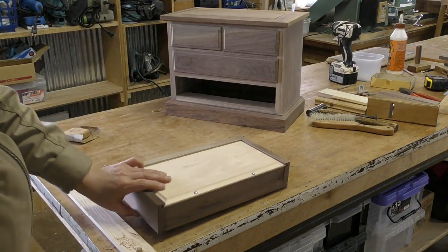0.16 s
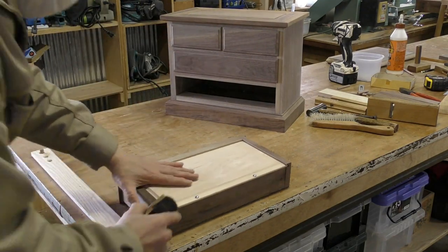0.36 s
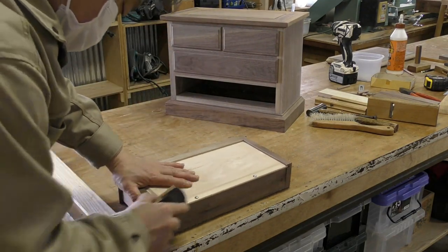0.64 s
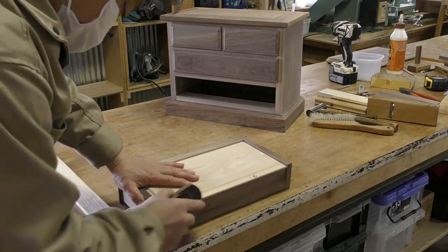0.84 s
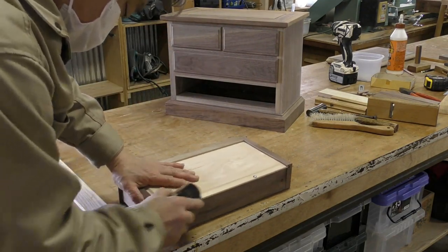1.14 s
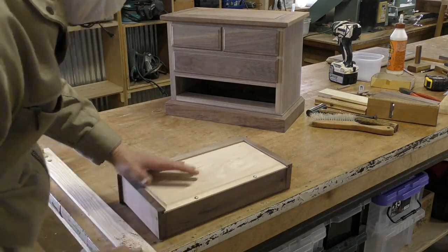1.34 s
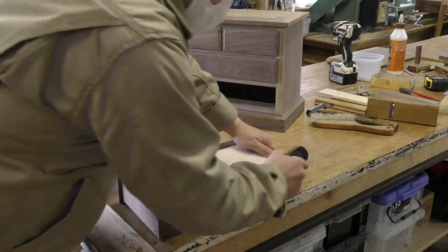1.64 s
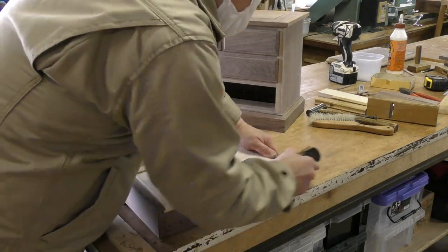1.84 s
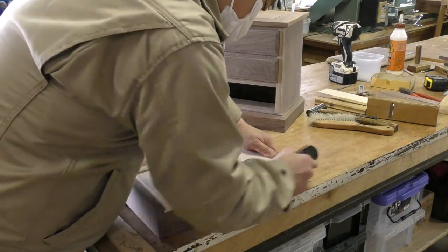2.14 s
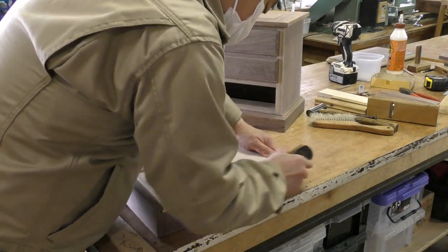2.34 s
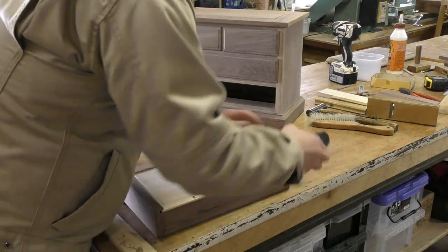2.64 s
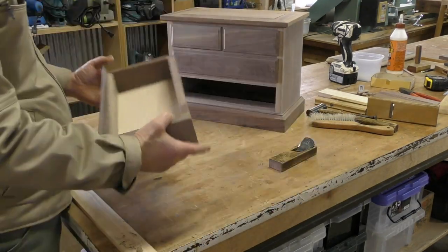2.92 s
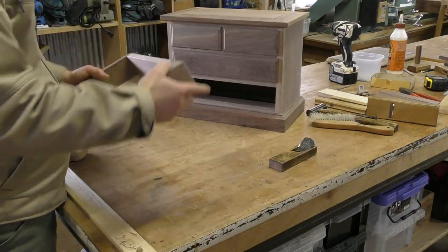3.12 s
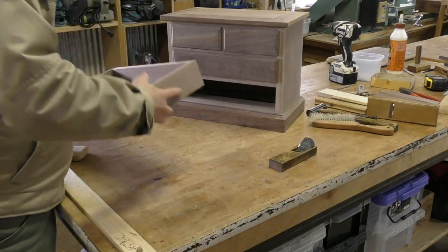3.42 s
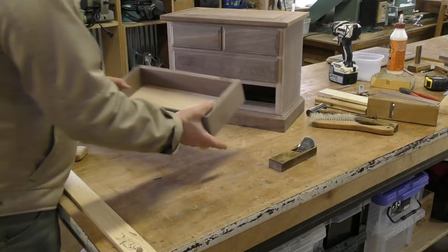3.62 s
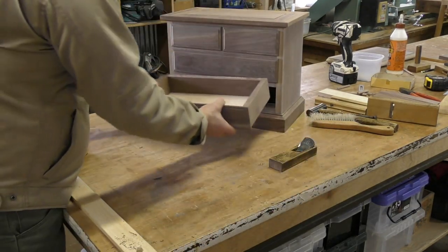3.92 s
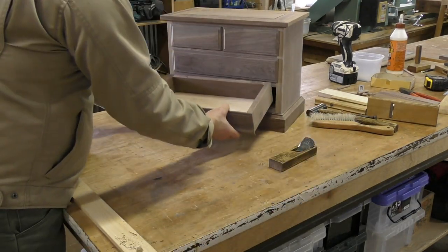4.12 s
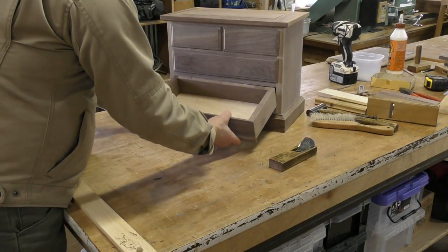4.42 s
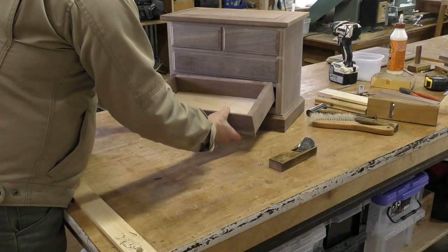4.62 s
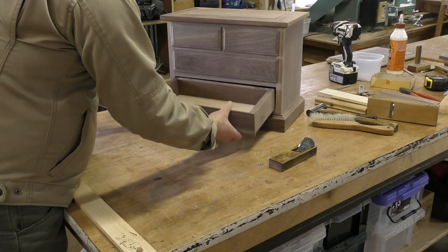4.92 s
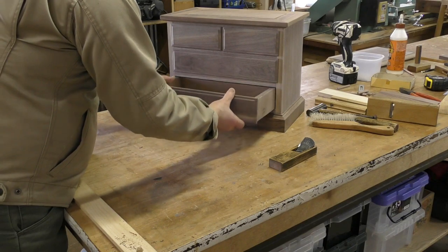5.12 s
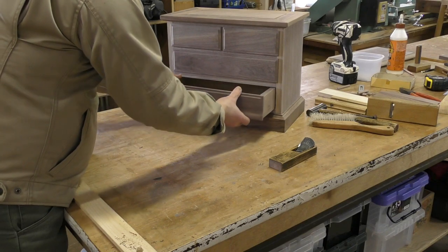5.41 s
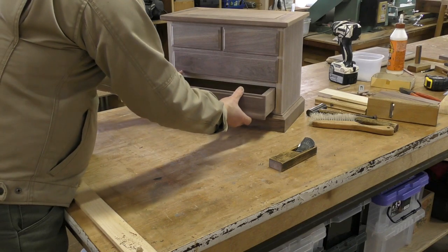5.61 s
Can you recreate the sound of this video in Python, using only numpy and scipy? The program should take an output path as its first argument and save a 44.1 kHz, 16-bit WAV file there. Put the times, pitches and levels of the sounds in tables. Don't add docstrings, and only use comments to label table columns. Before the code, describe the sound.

Workshop bench, close stereo microphone, with electrical lamp buzz over a low room hum. A hollow wooden drawer drags and knocks down, then sped-up hand plane strokes hiss, rap and thump it in hurried bursts. An abrupt cut brings rustling sleeves, light wooden knocks against a cabinet, a sharper clack, and a short groaning slide on wooden runners with a faint squeak.

```python
import sys
import numpy as np
from scipy import signal
from scipy.fft import rfft, irfft, next_fast_len
from scipy.io import wavfile
from scipy.ndimage import uniform_filter1d

SR = 44100
rng = np.random.default_rng(int(sys.argv[2]) if len(sys.argv) > 2 else 0)


def undo_db(level):
    steps = np.asarray(level, float) / 20
    return 10 ** steps


def unload_audio(sound):
    columns = np.transpose(np.atleast_2d(sound))
    steps = np.round(np.clip(columns, -1, 1) * 32767)
    wavfile.write(sys.argv[1], SR, steps.astype(np.int16))


N = 254010
TIME = np.arange(N) / SR
CUT_S = 2.962


def unit(x):
    return x / np.sqrt(np.mean(x ** 2) + 1e-20)


def along(points, hz):
    f, v = np.transpose(points)
    return np.interp(np.log(hz + 1), np.log(f + 1), v)


def filtered(x, response):
    m = next_fast_len(N + SR // 2)
    return irfft(rfft(x, m) * response(np.fft.rfftfreq(m, 1 / SR)), m)[..., :N]


def shaped(spectrum):
    return lambda hz: undo_db(along(spectrum, hz))


def resonant(peaks):
    return lambda f: sum(undo_db(db) * (1j * f * w / (c * c - f * f + 1j * f * w)) ** 2 for c, w, db in peaks)


def tone(hz, t):
    return np.sin(2 * np.pi * (hz * t + rng.random()))


def field(shape, across, over):
    return unit(uniform_filter1d(uniform_filter1d(rng.standard_normal(shape), across, -2), over, -1))


def rush(response, patchy_db, alike):
    z = signal.stft(rng.standard_normal((2, N)), nperseg=512)[2]
    patches = undo_db(patchy_db * field(z.shape[1:], across=5, over=6))
    pair = signal.istft(z * patches, nperseg=512)[1][:, :N]

    def mid_side(hz):
        turn = np.arccos(np.clip(along(alike, hz), -1, 1)) / 2
        return response(hz) * [np.cos(turn), np.sin(turn)]

    mid, side = filtered(pair, mid_side)
    return unit(np.array([mid + side, mid - side]))


def dying(t60, length, size=256):
    hz, t, z = signal.stft(rng.standard_normal((2, length)), SR, nperseg=size)
    return signal.istft(z * undo_db(-60 * t / t60(hz)[:, None]), SR, nperseg=size)[1][:, :length]


def swells(rows):
    t = TIME[::32]
    total = 0
    for s, db, rise, fall in rows:
        lengths = np.where(t < s, (s - t) / rise, (t - s) / fall)
        total = total + undo_db(db - 9 * np.clip(lengths, 0, 12))
    return np.interp(TIME, t, total)


def bursts(rows, voice, swell, fade):
    out = np.zeros(N)
    for s, db, rise, fall, *pitch in rows:
        span = slice(max(round((s - .06) * SR), 0), round((s + .2) * SR))
        t = TIME[span] - s
        shape = undo_db(-9 * np.where(t < 0, np.abs(t / rise) ** swell, np.abs(t / fall) ** fade))
        sound = voice(t, span, *pitch)
        level = np.sqrt(np.sum(shape ** 2) / np.sum((shape * sound) ** 2))
        out[span] += undo_db(db) * shape * sound * level
    return out


def timed(s, db, shape, *voice, slower_db=0):
    return (s, db, shape[0] * undo_db(slower_db), shape[1], *voice)


# freq_hz, level_db
LAMP_LINES = [(2008, -82), (2826, -79), (3908, -86), (4269, -89), (4387, -87), (4748, -86), (4990, -85),
              (5227, -87), (5469, -87), (5771, -87), (5889, -86), (6191, -87), (6250, -82), (6368, -86),
              (6492, -82), (6551, -81), (6611, -83), (6729, -79), (6971, -88), (7090, -74), (7332, -82),
              (7450, -83), (7574, -81), (7693, -84), (7811, -86), (7935, -90), (8533, -87), (8656, -83),
              (10880, -89), (12080, -90)]
# freq_hz, level_db
LAMP_COMB = [(900, -104), (2000, -97), (4000, -96), (7000, -93), (9000, -98), (13000, -100)]
MAINS_HZ, STEADY_HZ = 60.09, 7090
SLIP_S, SLIP_RAD = .6, 1.75


def lamps():
    bin_of = lambda hz: np.round(hz * N / SR)
    comb = MAINS_HZ * np.arange(15, 220)
    comb_db = along(LAMP_COMB, comb) + 6.1 * np.clip(rng.standard_normal(len(comb)), -3, 1)
    levels = dict(zip(bin_of(comb), comb_db))
    levels.update({bin_of(round(hz / MAINS_HZ) * MAINS_HZ): db for hz, db in LAMP_LINES})
    grid = np.zeros(N // 2 + 1, complex)
    for k, db in levels.items():
        grid[int(k)] = undo_db(db) * N / np.sqrt(2) * np.exp(2j * np.pi * rng.random())
    slip = np.exp(.5j * SLIP_RAD * np.array([[1], [-1]]))
    apart = irfft(grid * slip, N)
    near = np.abs(np.fft.rfftfreq(N, 1 / SR) - STEADY_HZ) < MAINS_HZ / 2
    early = apart + irfft(grid * near * (1 - slip), N)
    return np.where(TIME < SLIP_S, early, np.where(TIME < CUT_S, apart, irfft(grid, N)))


# freq_hz, level_db_per_hz
HUM = [(15, -51), (25, -24.5), (152, -6.5), (340, -5), (568, -21.5), (805, -23), (1080, -20), (2010, -18),
       (2240, -23), (2850, -20.5), (3180, -27.5), (4160, -29), (7320, -32.5), (8160, -31.5), (15600, -33.5)]
# freq_hz, likeness
HUM_ALIKE = [(60, 0.73), (300, 0.88), (1400, 0.81), (3500, 0.21), (7000, 0.067), (15000, 0.44)]


def background():
    return undo_db(-59.0) * rush(shaped(HUM), patchy_db=1.5, alike=HUM_ALIKE)


# peak_s, rustle_db, rise_s, fall_s, brush_over_rustle_db
MOVES = [(.058, -67, 0.021, 0.086, 2.5), (0.252, -79, 0.0037, 0.05, 13), (1.6, -73, 0.071, 0.19, -0.5),
         (2.972, -64, 0.011, 0.18, 3), (3.138, -59, 0.02, 0.032, -2.5), (3.309, -55, 0.049, 0.017, -6),
         (3.371, -51.5, 0.043, 0.053, -13.5), (3.49, -65, 0.01, 0.17, -16), (3.65, -69.5, 0.27, 0.45, 4.5),
         (3.748, -59.5, 0.04, 0.031, -38), (3.868, -63, 0.021, 0.02, -29), (3.948, -57, 0.0018, 0.025, 7.5),
         (5.37, -62.5, 0.14, 0.11, -6), (5.488, -68, 0.056, 0.13, -25)]
# freq_hz, level_db_per_hz
RUSTLE = [(1470, -63), (2500, 7), (2910, 4.5), (4170, 7), (4900, 4.5), (7820, 3), (8900, 5), (10200, 4),
          (15600, -3.5)]
# freq_hz, level_db_per_hz
BRUSH = [(350, -19), (600, -4), (871, -4.5), (1120, 4.5), (1680, 4.5), (1840, 8), (4000, -18), (5200, -22),
         (8800, -120)]


def sleeves():
    rustle = swells([row[:4] for row in MOVES])
    brush = swells([(s, db + more_db, rise, fall) for s, db, rise, fall, more_db in MOVES])
    cloth = rush(np.ones_like, patchy_db=1.9, alike=[(1000, .75), (4000, .8), (7000, .92), (15000, .84)])
    return rustle * unit(filtered(cloth, shaped(RUSTLE))) + brush * unit(filtered(cloth, shaped(BRUSH)))


def rubbing():
    return rush(np.ones_like, patchy_db=1, alike=[(100, .93), (5000, .85)])


# peak_s, level_db, rise_s, fall_s, body_hz
DRAGGING = [
    (.062, -49.5, 0.015, 0.027, 300),
    (.07, -65, .015, 0.024, 516),
    (.13, -56.5, .04, 0.047, 198),
]
DRAG_WIDTH_HZ = 98


def dragging():
    rub = rubbing()
    return sum(swells([row]) * unit(filtered(rub, resonant([(hz, DRAG_WIDTH_HZ, 0)])))
               for *row, hz in DRAGGING)


# start_s, crack_peak_db, hollow_over_crack_db,
# hardness_db_per_octave, carcass_over_hollow_db
KNOCKS = [(0.28, -33.5, -10.5, 2.5, -24), (0.297, -45, -4.5, 1.5, -28), (0.308, -38.5, -25, -1, -12),
          (2.914, -38.5, -17, -1.5, -43), (2.917, -33.5, -23, -4, -27), (2.9256, -42.5, -20, -2, -27),
          (2.949, -42, -16, 1, -27), (3.944, -37.5, -28, 0.5, -22), (4.216, -34.5, 2.5, -4.5, -2),
          (4.222, -54.5, 16.5, -5, -15), (4.737, -29.5, -7, -3.5, -10.5), (4.745, -49.5, 16, -8, -8.5),
          (4.856, -20, -17.5, 1, -13), (4.86, -27.5, -10, -1, -15), (4.8668, -25, -12, 1, -19),
          (5.45, -34, -11.5, -10.5, 13)]
# freq_hz, level_db_per_hz
CRACK = [(260, -7.5), (450, -7), (756, -18), (1090, -7.5), (2700, -13.5), (4670, -21), (5100, -26),
         (6010, -29), (8450, -33), (11900, -37.5), (15500, -70)]
# freq_hz, t60_s
WOOD = [(500, 0.2), (1000, 0.12), (1500, 0.087), (3000, 0.11), (6000, 0.11), (12000, 0.086)]
# freq_hz, level_db, t60_s
HOLLOW = [(196, -2, 0.2), (258, 9, 0.15), (319, 9.5, 0.085), (385, -9, 0.085)]
# freq_hz, level_db, t60_s
SIDES = [(361, -7, 0.3), (501, 0, 0.32), (1010, -4, 0.16), (1270, 10, 0.045), (1730, -13, 0.18),
         (2000, -13, 0.2), (2350, -14, 0.22), (2720, -15, 0.2), (2990, -8, 0.04), (3990, -20, 0.15),
         (4580, -20, 0.1)]
# freq_hz, level_db, t60_s
CARCASS = [(152, 6, 0.37)]
BENCH_RING, CABINET_RING = 1.3, 0.69
RING_PER_HOLLOW_DB, BENCH_DAMP_DB = 0.43, -12


def ring(modes, t, length):
    return sum(undo_db(db + rng.normal(0, 1.0) - 60 * t / (t60 * length)) * tone(hz, t) for hz, db, t60 in modes)


def knocks():
    out, t = np.zeros(N + SR), np.arange(SR // 4) / SR
    hz = np.fft.rfftfreq(len(t), 1 / SR)
    octaves = np.log2(np.clip(hz, 500, None) / 1000)
    closing = np.sqrt(np.clip(5 * (1 - t / t[-1]), 0, 1)) ** 4
    for s, db, hollow_db, hardness_db, carcass_db in KNOCKS:
        on_bench = s < CUT_S
        length = (BENCH_RING if on_bench else CABINET_RING) * undo_db(RING_PER_HOLLOW_DB * min(hollow_db, 0))
        colour = undo_db(along(CRACK, hz) + hardness_db * octaves)
        noise = dying(lambda f: length * along(WOOD, f), len(t), size=128)[0]
        dense = irfft(rfft(noise) * colour, len(t))
        sides_db = -11.5 + 2 * hardness_db + BENCH_DAMP_DB * on_bench
        crack = dense / np.abs(dense).max() + undo_db(sides_db) * ring(SIDES, t, length)
        hollow = ring(HOLLOW, t, length) + undo_db(carcass_db) * ring(CARCASS, t, length)
        sound = crack * (1 - np.exp(-t / .001)) + undo_db(hollow_db - 3) * hollow * (1 - np.exp(-t / .004))
        out[round(s * SR):][:len(t)] += undo_db(db) * sound * closing
    return out[:N]


# freq_hz, level_db
BOX = [(255, -22), (325, -10), (372, -9.5), (410, -24), (500, -23)]


def thump(t, span, hz, second_hz, second_db):
    rest = sum(undo_db(db + rng.normal(0, 2.6)) * tone(c * rng.normal(1, 0.054), t) for c, db in BOX)
    return tone(hz, t) + undo_db(second_db) * tone(second_hz, t) + rest


# freq_hz, level_db
PLATES = [(650, -8.5), (745, -13), (985, -13), (1190, -14.5), (1370, -8.5), (1530, -7), (1760, -8),
          (1960, -9.5), (2150, -10.5), (2800, -14)]
NOTE_DB, NOTE_DAMP_DB_PER_S = 1, 330


def rap(t, panel, hz, bottom_hz, bottom_db):
    plates = sum(undo_db(db + rng.normal(0, 2.5)) * tone(c * rng.normal(1, .01), t) for c, db in PLATES)
    notes = tone(hz, t) + undo_db(bottom_db) * tone(bottom_hz, t) + plates
    return panel + undo_db(NOTE_DB - NOTE_DAMP_DB_PER_S * np.abs(t)) * notes


# peak_s, level_db, fall_s
CUTS = [(0.288, -64, 0.0085), (0.604, -50, 0.019), (0.729, -48, 0.016), (0.895, -66, .006),
        (0.993, -55, 0.014), (1.139, -49, .018), (1.265, -48.5, .016), (1.858, -49.5, 0.013),
        (1.94, -68, 0.0092), (2.0, -51.5, 0.013), (2.249, -51, 0.02), (2.392, -45, 0.013),
        (2.519, -49.5, 0.015)]
# peak_s, level_db, note_hz, second_hz, second_db
CUT_THUDS = [(0.287, -36.5, 313, 373, -4), (0.611, -35.5, 242, 434, -12), (0.733, -40, 269, 430, -36),
             (0.999, -51, 250, 370, -4), (1.142, -38.5, 225, 281, -0.5), (1.269, -47.5, 303, 235, 2),
             (1.865, -43.5, 245, 367, -12), (1.951, -39.5, 261, 347, -5), (1.997, -45, 272, 366, -7),
             (2.259, -39, 252, 384, -31), (2.407, -51.5, 400, 244, 2), (2.529, -37.5, 240, 336, -4)]
# peak_s, level_db, side_hz, bottom_hz, bottom_db
CUT_RAPS = [(0.286, -47, 1747, 730, -10), (0.603, -48, 1917, 666, 0.5), (0.733, -46, 1433, 670, -19),
            (0.992, -51.5, 1520, 1870, -2), (1.136, -46.5, 1780, 1520, 1), (1.263, -45, 1327, 1500, 0),
            (1.858, -48.5, 1420, 645, 3), (1.948, -46, 1460, 1037, 4), (1.995, -54, 1490, 630, 0),
            (2.246, -49.5, 1745, 640, -7), (2.404, -45.5, 1650, 683, -0.5), (2.517, -47, 1355, 1080, -5)]
# peak_s, level_db, note_hz, second_hz, second_db
LANDINGS = [(0.323, -41.5, 372, 280, -11), (0.346, -48, 370, 239, 8), (0.403, -52, 357, 248, 5),
            (0.435, -34, 294, 370, -6.5), (0.46, -47, 360, 262, 9), (0.501, -46.5, 250, 312, -8),
            (0.546, -38, 288, 352, -17), (0.56, -41, 318, 382, -5), (0.674, -35.5, 254, 407, -7),
            (0.691, -41, 275, 403, -11), (0.897, -43.5, 385, 260, -5.5), (0.951, -64, 293, 398, 4),
            (1.068, -39, 307, 236, -6), (1.194, -45.5, 258, 313, -2), (1.485, -45, 370, 241, -0.5),
            (1.67, -41, 231, 316, -4.5), (1.754, -38.5, 338, 233, -6.5), (1.782, -39.5, 280, 324, -9),
            (1.8, -38.5, 239, 320, -14), (2.034, -64, 247, 347, 4), (2.144, -44.5, 336, 237, -5),
            (2.192, -42.5, 245, 330, -4), (2.211, -47, 347, 203, 7), (2.325, -46, 254, 380, -9),
            (2.45, -40, 266, 385, -13), (2.933, -59, 411, 290, -12), (2.958, -61, 244, 420, -5)]
# peak_s, level_db, side_hz, bottom_hz, bottom_db
LAND_RAPS = [(0.316, -51.5, 1752, 693, 16), (0.342, -58, 1750, 670, -17), (0.435, -63, 1610, 664, 15),
             (0.533, -58, 2050, 720, 2), (0.561, -53, 1390, 710, 13), (0.668, -47.5, 1700, 680, 3),
             (0.896, -46, 1380, 722, -2.5), (0.948, -67, 1550, 744, 7), (1.043, -70, 1520, 872, -5),
             (1.065, -49, 1955, 727, 0.5), (1.199, -50, 1740, 740, 3), (1.679, -64, 1760, 690, 6),
             (1.753, -49.5, 1736, 622, 5.5), (1.781, -56, 1500, 648, 18), (2.016, -60.5, 1400, 670, 5),
             (2.146, -46.5, 1465, 980, 3), (2.189, -50.5, 2130, 632, 9), (2.32, -51, 1210, 687, -1),
             (2.383, -49, 1580, 935, -5), (2.451, -54.5, 1455, 636, 8), (2.92, -48.5, 1380, 964, 3.5),
             (2.935, -52.5, 1275, 694, 8), (2.957, -54, 1460, 1060, 17)]
# rise_s, fall_s of each kind
CUT_THUMP, CUT_RAP, CUT_SHAVE = (0.0094, 0.0049), (0.012, 0.0067), (0.012, 0.0091)
LAND_THUMP, LAND_RAP = (0.0076, 0.0064), (0.0065, 0.0094)
FIRM_DB, SLOWER_PER_DB = -35, -0.55
CUT_GRAZE_DB = -24


def stroke_rows():
    soft = lambda db: np.clip(SLOWER_PER_DB * (FIRM_DB - db), 0, 14)
    thuds = [timed(s, db, CUT_THUMP, *notes) for s, db, *notes in CUT_THUDS]
    thuds += [timed(s, db, LAND_THUMP, *notes, slower_db=soft(db)) for s, db, *notes in LANDINGS]
    raps = [timed(s, db + 1.0, CUT_RAP, *notes) for s, db, *notes in CUT_RAPS]
    raps += [timed(s, db + 1.5, LAND_RAP, *notes) for s, db, *notes in LAND_RAPS]
    shaves = [(s, db, CUT_SHAVE[0], fall) for s, db, fall in CUTS]
    shaves += [timed(s, db + CUT_GRAZE_DB, CUT_SHAVE) for s, db, *_ in LAND_RAPS]
    return thuds, raps, shaves


# freq_hz, level_db_per_hz
PANEL = [(600, -5.5), (1050, -4), (1250, 0.5), (1500, 5.5), (1750, -6.5), (2050, -3.5), (2450, -8),
         (3400, -12), (6000, -23), (9000, -64)]
# freq_hz, level_db_per_hz
BLADE = [(1470, -40), (2500, 0.5), (4400, 7.5), (5370, 1.5), (6070, 8.5), (7940, 8), (15600, -3)]
# peak_s, level_db
BENCH_TOP = [(0.44, -54), (0.523, -55), (0.562, -46.5), (0.621, -47), (0.69, -44.5), (0.736, -47.5),
             (0.917, -76), (1, -59.5), (1.086, -52), (1.162, -46.5), (1.217, -46), (1.29, -59.5),
             (2.935, -67)]
TOP_HZ, TOP_BOOM = 145.3, (0.013, 0.027)
SMEAR = 2
BITE, LIFT = 2.2, 1.1


def planing():
    grit = rush(np.ones_like, patchy_db=3, alike=[(100, 0)])
    panel = unit(filtered(grit[0], shaped(PANEL)))
    blade = unit(filtered(grit[1], shaped(BLADE)))
    thud_rows, rap_rows, shave_rows = stroke_rows()
    boom_rows = [timed(s, db, TOP_BOOM) for s, db in BENCH_TOP]
    thuds = bursts(thud_rows, thump, swell=SMEAR, fade=0.56)
    raps = bursts(rap_rows, lambda t, span, *notes: rap(t, panel[span], *notes), swell=SMEAR, fade=0.57)
    shaves = bursts(shave_rows, lambda t, span: blade[span], swell=BITE, fade=LIFT)
    booms = bursts(boom_rows, lambda t, span: tone(TOP_HZ * rng.normal(1, 0.045), t), swell=5.1, fade=0.82)
    return thuds + raps + shaves + booms


# peak_s, level_db, rise_s, fall_s, pitch_hz
FOLDS = [
    (3.285, -60, 0.014, 0.042, 8800),
    (3.36, -56, .015, 0.036, 5080),
    (3.39, -58, 0.029, 0.076, 5740),
    (3.39, -61, 0.022, 0.056, 3010),
    (3.5, -65, .03, 0.082, 5160),
]
FOLD_WIDTH_HZ = 450


def folds():
    slow_noise = lambda hz: 1 / (1 + (2 * hz / FOLD_WIDTH_HZ) ** 4)
    slow = unit(filtered(rng.standard_normal((2, N)), slow_noise))
    out = np.zeros(N)
    for *row, hz in FOLDS:
        phase = 2 * np.pi * hz * TIME
        out += swells([row]) * (slow[0] * np.cos(phase) + slow[1] * np.sin(phase))
    return out


# time_s, runner_db
PUSH = [(5.1, -78), (5.17, -71), (5.24, -57.5), (5.29, -47.5), (5.33, -51), (5.36, -47), (5.4, -47.5),
        (5.448, -45), (5.49, -47), (5.54, -58.5), (5.602, -68.5), (5.76, -59)]
# peak_s, level_db, rise_s, fall_s
SCRAPING = [
    (5.19, -65, 0.03, 0.39),
    (5.32, -58.5, 0.06, 0.08),
    (5.39, -63, 0.032, .03),
    (5.462, -60, .015, 0.016),
]
# peak_s, level_db, rise_s, fall_s
SQUEALING = [
    (5.445, -57.5, .025, .025),
    (5.39, -69, .05, .06),
    (5.54, -72, .08, .15),
]
# freq_hz, width_hz, level_db
RUNNER = [(218.5, 69, -6.5), (375, 123, -6.5), (702, 46, -11), (914, 28, -15.5)]
# freq_hz, width_hz, level_db
SCRAPE = [(1330, 280, -3), (1467, 64, -3), (1674, 100, -6), (1936, 200, -8), (2025, 44, -6.5)]
# freq_hz, width_hz, level_db
SQUEAK = [(2680, 120, 0)]
GROAN_HZ, GROAN_DB, GROAN_WANDER_RAD = 411, -4.5, 2.7
SQUEAL_HZ, SQUEAL_OCTAVE_DB, SQUEAL_WANDER_RAD = 2680, -13, 2.3
RUB_SHARE = .75


def slide():
    push_s, push_db = np.transpose(PUSH)
    pushing = (TIME >= push_s[0] - .01) & (TIME <= push_s[-1] + .01)
    runner_gain = undo_db(np.where(pushing, np.interp(TIME, push_s, push_db), -150))
    rub = rubbing()
    runner, scrape, squeak = (unit(filtered(rub, resonant(peaks))) for peaks in (RUNNER, SCRAPE, SQUEAK))
    wander = unit(filtered(rng.standard_normal(N), lambda hz: 1 / (1 + (hz / 9) ** 2)))
    groan = undo_db(GROAN_DB) * np.sin(2 * np.pi * GROAN_HZ * TIME + GROAN_WANDER_RAD * wander)
    phase = 2 * np.pi * SQUEAL_HZ * TIME + SQUEAL_WANDER_RAD * wander[::-1]
    squeal = .6 * squeak + np.sin(phase) + undo_db(SQUEAL_OCTAVE_DB) * np.sin(2 * phase)
    return runner_gain * (groan + RUB_SHARE * runner) + swells(SCRAPING) * scrape + swells(SQUEALING) * squeal


# peak_s, level_db, note_hz, second_hz, second_db
SEATING = [
    (5.407, -40, 433, 244, -18),
    (5.459, -44, 370, 226, -11),
    (5.467, -41.5, 357, 464, -3),
    (5.479, -42, 373, 247, -18),
]
SEAT_THUMP = (0.0039, 0.0056)  # rise_s, fall_s


def seating():
    return bursts([timed(s, db, SEAT_THUMP, *notes) for s, db, *notes in SEATING], thump, swell=3.9, fade=1.1)


# freq_hz, t60_s
SHOP = [(150, 0.38), (700, 0.53), (2000, 0.51), (5000, 0.4), (12000, 0.022)]


def shop(x, hurry):
    a, b = dying(lambda hz: along(SHOP, hz) / hurry, SR // 2)
    tail = np.array([a + 0.33 * b, a - 0.48 * b])
    late = np.pad(x, (200, 0))[None]
    return signal.fftconvolve(late, tail / np.linalg.norm(tail[0]), axes=1)[:, :N]


def sped_up(x):
    hz, _, z = signal.stft(x[:, :3 * SR], SR, nperseg=1024, noverlap=768)
    turn_rad = along([(200, 1.0), (450, 1.1), (900, 1.05), (6000, 1.05)], hz)[:, None]
    turn = turn_rad * field(z.shape[1:], across=6, over=16)
    opposed = np.array([1, -1])[:, None, None]
    drifted = signal.istft(z * (1 + 1j * turn * opposed), nperseg=1024, noverlap=768)[1]
    return np.pad(drifted, ((0, 0), (0, N)))[:, :N]


KNEE_DB, SQUEEZE, RECOVER_S = -52.5, 0.42, 0.18
IDLE_DB = (-6.5, -1.64)


def automatic_gain(loud):
    keep, cut = np.exp(-1 / (RECOVER_S * SR)), round(CUT_S * SR)
    parts = (loud[:cut], loud[cut:])
    power = np.concatenate([signal.lfilter([1 - keep], [1, -keep], part ** 2) for part in parts])
    over_db = 10 * np.log10(1 + power / undo_db(2 * KNEE_DB))
    return undo_db(np.where(TIME < CUT_S, *IDLE_DB) - SQUEEZE * uniform_filter1d(over_db, size=2000))


def scene():
    no_deep_bass = lambda hz: (1j * hz / (95 + 1j * hz)) ** 3
    strokes, hits = filtered(np.array([planing(), knocks() + seating()]), no_deep_bass)
    gain = automatic_gain(strokes + hits)
    around = slide() + dragging() + sleeves() + gain * background()
    bench = strokes + hits
    cabinet = hits * (TIME > CUT_S + .5)
    before = sped_up(bench + undo_db(-10.5) * shop(bench, hurry=4.0) + around)
    after = cabinet + undo_db(-8.0) * shop(cabinet, hurry=1.35) + around + folds()
    return np.where(TIME < CUT_S, before, after) + 1.535 * gain * lamps()


def band_limit(x):
    return signal.sosfilt(signal.butter(12, 15710, fs=SR, output="sos"), x)


# freq_hz, left_over_right_db, left_lead_rad
LEAN = [(50, -10.5, 0.15), (122, -2, 0.087), (293, 1, 0.19), (690, 1.5, 0.31), (1500, 0.5, 0.092),
        (9000, 0.5, 0.007)]


def record(dry):
    f, db, lead_rad = np.transpose(LEAN)

    def ports(hz):
        lean = along(np.transpose([f, db]), hz)
        lead = along(np.transpose([f, lead_rad]), hz)
        half = undo_db(lean / 2) * np.exp(.5j * lead)
        return (hz < 15760) * np.array([half, 1 / half])

    mix = filtered(dry, ports)
    return band_limit(mix)


dry = scene()
out = record(dry)
unload_audio(out)
```